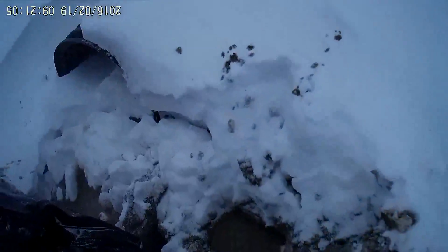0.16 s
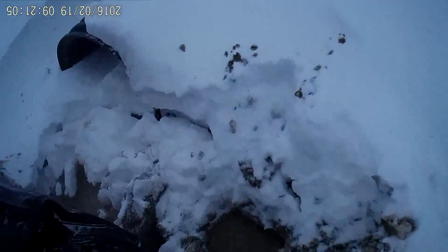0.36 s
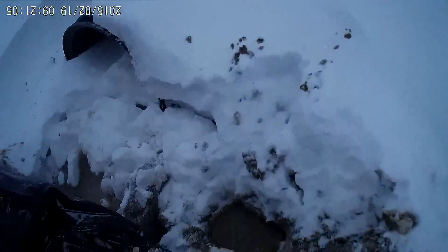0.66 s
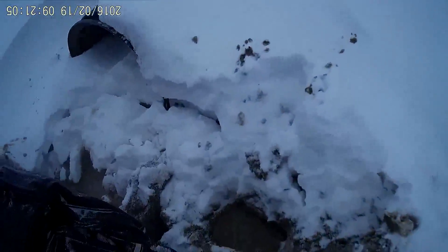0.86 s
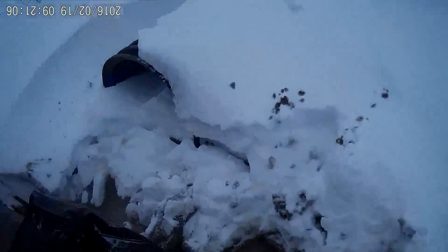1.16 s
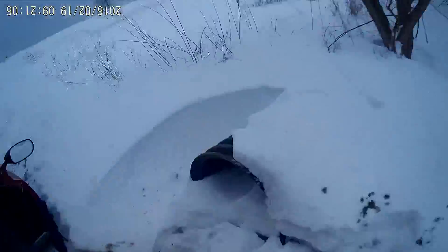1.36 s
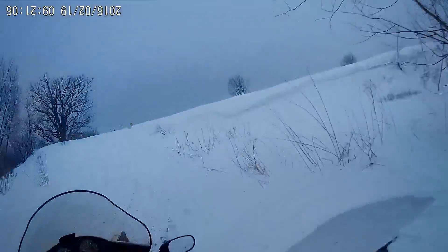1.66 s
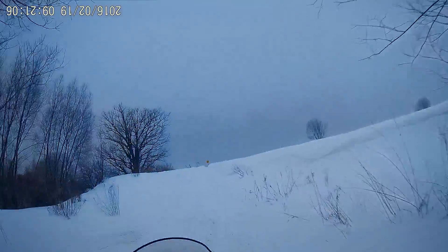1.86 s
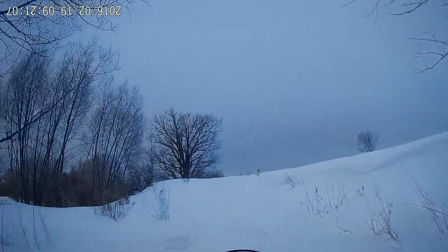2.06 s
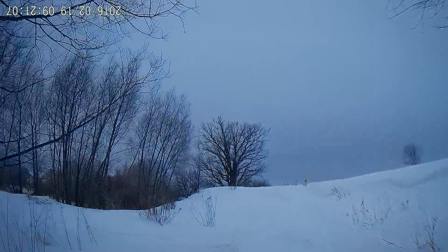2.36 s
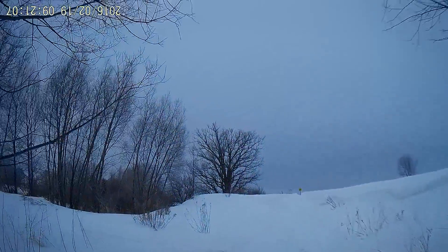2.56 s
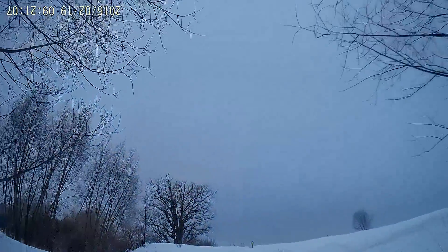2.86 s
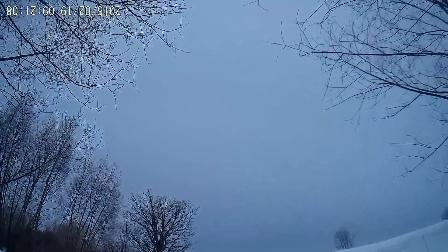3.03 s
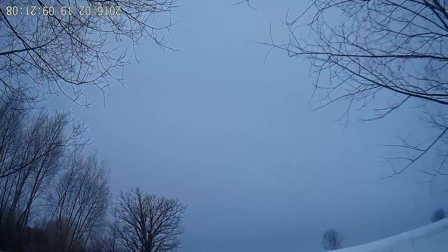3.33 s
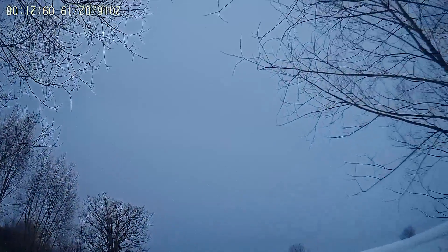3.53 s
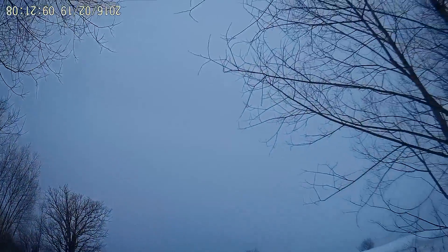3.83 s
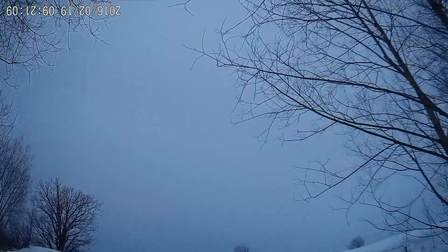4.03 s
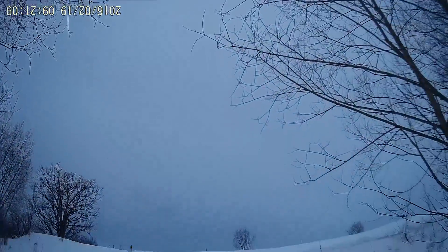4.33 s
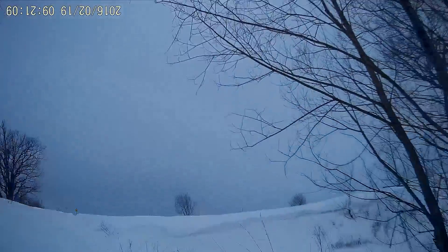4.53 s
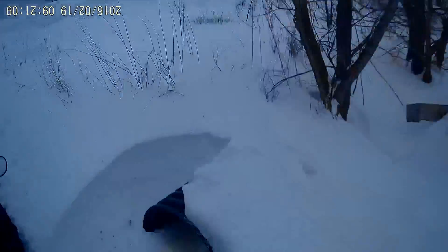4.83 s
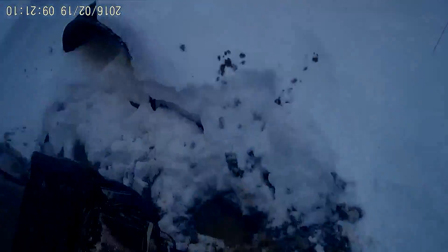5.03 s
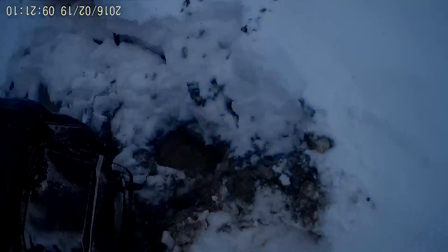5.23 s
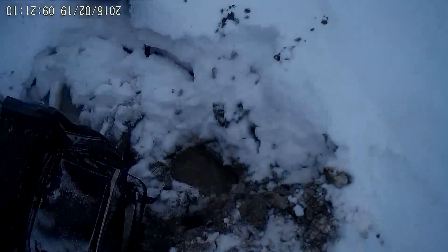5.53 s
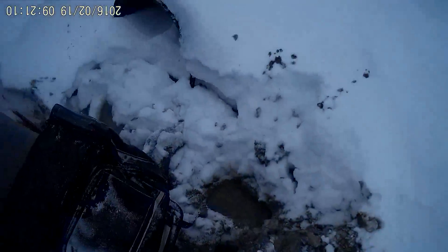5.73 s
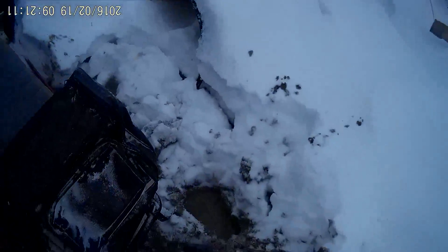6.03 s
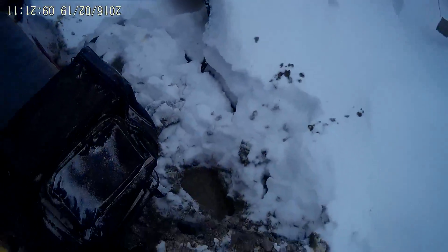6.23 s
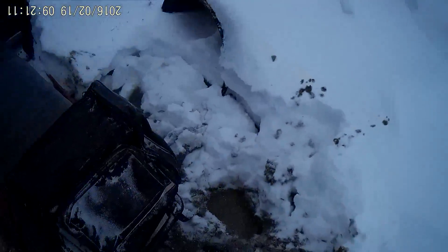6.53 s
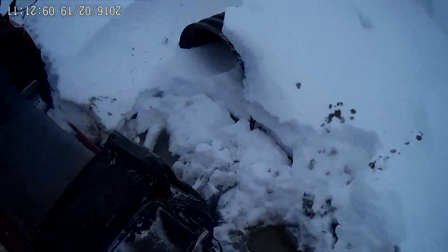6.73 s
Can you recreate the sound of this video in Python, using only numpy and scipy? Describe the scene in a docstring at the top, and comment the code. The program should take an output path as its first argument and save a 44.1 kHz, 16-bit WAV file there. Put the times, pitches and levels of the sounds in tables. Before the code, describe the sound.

A two-stroke snowmobile idles quietly for the whole seven seconds, an uneven hum with soft burbling thuds and a light, hissy rattle over a low wash of air. The microphone is worn by the rider, outdoors, with no echo. A tiny high squeak comes at about 1.2 seconds. From 2 to 4.5 seconds the idle sounds thinner, with a faint whine, four small sharp engine ticks and two light tocks near 3.4 and 4 seconds. At 4.8 seconds stiff jacket cloth bumps and scrapes the microphone, much louder than the engine. Crisp crackles of crusted snow and more rubbing follow in bursts, strongest around 5 and 6 seconds, while the idle grows a little louder. At 6.3 seconds a fastener strikes the microphone's case with a bright snap, the loudest sound. Another bump, scrape and sharp crackle follow at 6.6 seconds.

```python
"""First comes the uneven hum, burble and clatter of a two-stroke snowmobile idling, bogged in snow.
Each stroke pumps the exhaust; each firing thuds in the muffler and shakes the engine.
We hear it from a camera worn by the rider, who looks up, then down. Over a low wash of air come
a tiny squeak, a few sharp ticks from the engine and two light tocks on the sled. Then stiff jacket
cloth bumps and scrapes the camera, crusted snow crackles and a fastener snaps against the case."""
import sys
import numpy as np
from scipy import signal
from scipy.fft import rfft, irfft
from scipy.io import wavfile

SR = 44100
rng = np.random.default_rng(int(sys.argv[2]) if len(sys.argv) > 2 else 0)


def put_to_file(sound):
    """Save the sound as 16-bit audio at rate SR, in the file named by the first command-line argument."""
    columns = np.atleast_2d(sound).T  # one column per channel
    safe = np.clip(columns, -1, 1)
    whole_steps = np.round(safe * 32767)
    wavfile.write(sys.argv[1], SR, whole_steps.astype(np.int16))


N = 303849
T = np.arange(N) / SR
HZ = np.fft.rfftfreq(N, 1 / SR)


def amp(db):
    """Turns decibels into a gain."""
    return 10 ** (np.asarray(db) / 20)


def unit(x):
    """Scales a sound to an average (rms) level of 1."""
    return x / np.sqrt(np.mean(x ** 2) + 1e-20)


def curve(rows):
    """Joins (time_s, value) points with straight lines."""
    return np.interp(T, *np.transpose(rows))


def add(mix, start_s, sound):
    """Mixes a sound in at start_s."""
    part = mix[round(start_s * SR):][:len(sound)]
    part += sound[:len(part)]


def colour(points, peaks=(), hz=HZ):
    """A gain for each pitch: a broad shape with ringing peaks on top."""
    pitches, db = np.transpose(points)
    power = amp(np.interp(np.log(hz + 1), np.log(pitches), db)) ** 2
    for centre, width, peak_db in peaks:
        power += amp(peak_db) ** 2 / (1 + 2 * ((hz - centre) / width) ** 2) ** 2
    return np.sqrt(power)


def shaped(x, gain):
    """Filters a sound with a gain for each pitch."""
    return irfft(rfft(x) * gain, len(x))


def noise(gain, length=N):
    """Filtered noise at level 1."""
    return unit(shaped(rng.standard_normal(length), gain))


def wander(rate_hz):
    """A smooth random drift."""
    return noise(np.exp(-(HZ / rate_hz) ** 2))


def fuzzy_tone(pitch_hz, width_hz):
    """Noise so narrow that it has a pitch."""
    return noise(1 / (1 + 2 * ((HZ - pitch_hz) / width_hz) ** 2))


def play_bands(x, gain, edges_hz, levels_db):
    """Filters a sound, then lets each pitch band follow its own level."""
    bands = [unit(shaped(x, gain * (HZ >= lo) * (HZ < hi))) for lo, hi in zip(edges_hz, edges_hz[1:])]
    return sum(amp(db) * band for db, band in zip(levels_db, bands))


def grains(per_s, spread_db):
    """Scattered clicks, most small and a few large."""
    size = amp(spread_db * np.minimum(rng.exponential(1, N), 4)) * rng.choice([-1, 1], N)
    return unit(size * (rng.random(N) < per_s / SR))


def swell(t, peak_s):
    """A pulse that rises to 1 at peak_s and dies away."""
    return (t / peak_s) ** 2 * np.exp(2 * (1 - t / peak_s))


def reflected(x, wet, decay_s):
    """Adds very short echoes from nearby panels."""
    t = np.arange(SR // 30) / SR
    tail = rng.standard_normal(len(t)) * np.exp(-t / decay_s) * (t > .002)
    return x + wet * signal.oaconvolve(x, tail / np.linalg.norm(tail))[:N]


def struck(blows, tones, rise_s):
    """A hard thing rings with the same tones at each blow."""
    out, t = np.zeros(N), np.arange(SR // 20) / SR
    ring = sum((-1) ** k * amp(db - 60 * t / fade_s) * np.sin(2 * np.pi * hz * t)
               for k, (hz, db, fade_s) in enumerate(tones))
    ring *= 1 - np.exp(-t / rise_s)
    for start_s, db in blows:
        add(out, start_s, amp(db) * ring / abs(ring).max())
    return out


def firings(stroke_count, miss_chance, uneven_db=1.5, weak_gain=0.64):
    """Fuel burns about every fourth or fifth stroke, weak and strong by turns; weak ones can miss."""
    strokes = np.flatnonzero(np.diff(np.floor(stroke_count)))
    gaps = rng.choice([3] + [4] * 6 + [5] * 5, len(strokes))
    chosen = np.cumsum(gaps) - gaps[0]
    fired = strokes[chosen[chosen < len(strokes)]]
    kicks = np.zeros(N)
    kicks[fired] = amp(uneven_db * rng.standard_normal(len(fired)))
    weak = fired[::2]
    kicks[weak] *= weak_gain * (rng.random(len(weak)) > miss_chance[weak])
    return kicks


def exhaust_hum(phase, kicks, level_db, collapse_s=0.0039, rebuild_s=0.02):
    """Strokes keep a wave going in the pipe; a strong firing breaks it up and it builds again."""
    t = np.arange(SR // 10) / SR
    hum = np.sin(phase) + amp(-19) * np.sin(2 * phase) + amp(-23) * np.sin(3 * phase)
    dip = 1.8 * (np.exp(-t / rebuild_s) - np.exp(-t / collapse_s))
    hum *= np.exp(-signal.oaconvolve(kicks ** 2, dip)[:N])
    return unit(hum) * amp(level_db + 0.36 * wander(30))


# The muffler's low tones: pitch_hz, level_db, swell_s
MUFFLER_TONES = [(63.6, -12.5, 0.039), (194.7, 4.5, 0.0075), (243.7, -4.5, 0.0061), (404, -9, 0.0014),
                 (499.4, -23.5, 0.013)]
def burble(kicks, extra_db, gaze):
    """Each firing rings the muffler with a soft thud."""
    t = np.arange(SR // 10) / SR
    thud = sum(amp(db) * swell(t, swell_s) * np.sin(2 * np.pi * hz * t)
               for hz, db, swell_s in MUFFLER_TONES)
    return amp(-51 + 1.12 * extra_db - 5 * gaze) * unit(signal.oaconvolve(kicks, thud)[:N])


# The clatter from bass to treble: pitch_hz, level_db
CLATTER_SHAPE = [(250, -8), (420, -11), (650, -19), (900, -15), (1600, -12.5), (2300, -23), (3100, -4),
                 (3500, -16), (6500, -12.5), (9000, -20), (11000, -19.5), (15500, -29)]
# Where the engine and its hood ring: pitch_hz, width_hz, level_db
HOOD_RINGS = [(496, 14, -6), (928, 23, -2), (1161, 106, 0), (1453, 90, -5.5), (2220, 310, -7),
              (2720, 280, 0.5), (2880, 230, -1), (3950, 470, -12.5), (4880, 400, -12), (5820, 230, -13),
              (6920, 360, -1.5), (7360, 300, -6.5), (8360, 560, -11), (9510, 290, -8)]
# Brief surges and dips: middle_s, half_length_s, knock_and_rattle_db, hiss_db
CLATTER_SURGES = [(0.492, 0.039, 2, 3), (1.08, 0.039, 4, 3.5), (1.231, 0.066, 5, 5), (1.75, 0.099, 2, 3.5),
                  (2.093, 0.054, -0.5, 2.5), (2.916, 0.02, 4.5, 4.5), (3.273, 0.1, 0.5, 4.5),
                  (4.563, 0.13, 5, 2.5), (5.45, 0.05, -2.5, -5)]
def clatter(phase, flare, extra_db, gaze):
    """The shaken engine knocks, rattles and hisses, throbbing with strokes and flaring with firings."""
    shake = (1 + 0.57 * flare) * (1 + 0.091 * np.cos(phase)) * amp(1.17 * wander(1.7))
    grit = rng.standard_normal(N) + 0.37 * grains(per_s=700, spread_db=3)
    drive = reflected(shake * grit, wet=.33, decay_s=.008)
    surges = sum(np.outer(dbs, np.exp(-((T - middle_s) / half_s) ** 2))
                 for middle_s, half_s, *dbs in CLATTER_SURGES)
    surge_db, hiss_surge_db = surges + 0.02
    knock_db = -57.5 + 0.87 * extra_db - gaze + surge_db
    rattle_db = -57.5 + 1.46 * extra_db + 2.56 * gaze + surge_db
    hiss_db = -59.5 + extra_db + 3.87 * gaze + hiss_surge_db
    levels_db = [db + 1.03 * wander(32) for db in (knock_db, rattle_db, hiss_db)]
    return play_bands(drive, colour(CLATTER_SHAPE, HOOD_RINGS), [280, 1900, 3500, SR / 2], levels_db)


# The bright spit of gas: pitch_hz, level_db
SPIT_SHAPE = [(2500, -21), (5000, -13), (7500, 6), (10000, 1), (15000, 4)]
def spit(flare, extra_db):
    """Gas spits out at each strong firing."""
    return amp(-55 + extra_db) * np.tanh(flare) ** 2 * noise(colour(SPIT_SHAPE))


# The idle speed: time_s, strokes_per_s
IDLE_SPEED = [(0.0, 95.8), (0.5, 96.2), (1.3, 93.5), (2.1, 95.2), (2.8, 94.8), (4.1, 97.2), (4.8, 97.5),
              (5.5, 93.0), (6.0, 91.6), (6.89, 92.2)]
# The engine's loudness, higher when the rider leans in: time_s, level_db
ENGINE_LEVEL = [(0, -45), (0.9, -45), (1.8, -43.5), (2.5, -45.5), (3.1, -45), (3.9, -46.5), (4.65, -47),
                (5.1, -40.5), (5.45, -43.5), (6.0, -38.5), (6.42, -42.5), (6.89, -37.5)]
# Where the rider looks: time_s, gaze (0 is down at the sled, 1 or more is up at the sky)
RIDER_GAZE = [(0, 0.033), (1.25, 0.012), (1.75, 0.43), (2.4, 1.56), (3.3, 1.05), (4.3, 1.67), (4.95, 0.025),
              (6.89, 0.14)]
def engine(usual_db=-45):
    """One beat drives the engine's sounds; looking up thins the burble and lets a faint whine through."""
    level_db, gaze = curve(ENGINE_LEVEL), curve(RIDER_GAZE)
    extra_db = level_db - usual_db
    stroke_count = np.cumsum(curve(IDLE_SPEED)) / SR + 0.038 * wander(12)
    phase = 2 * np.pi * stroke_count
    kicks = firings(stroke_count, miss_chance=0.31 * gaze)
    t = np.arange(SR // 10) / SR
    flare = signal.oaconvolve(kicks ** 2, swell(t, peak_s=0.0067))[:N]  # a pulse for each firing
    exhaust = exhaust_hum(phase, kicks, level_db - 0.9) + burble(kicks, extra_db, gaze)
    rasp = clatter(phase, flare, extra_db, gaze) + spit(flare, extra_db)
    whine = gaze * amp(level_db - 26.5) * fuzzy_tone(pitch_hz=5910, width_hz=140)
    return exhaust + rasp + whine


# The low wash of air: pitch_hz, level_db
AIR_SHAPE = [(10, -28), (25, -4), (42, 5.5), (70, -12.5), (150, -0.5), (240, -8.5), (310, -60),
             (700, -19.5), (2000, -33)]
def air(level_db=-56):
    """The open air rumbles softly."""
    return amp(level_db) * noise(colour(AIR_SHAPE))


# The squeak's tones: multiple_of_base_pitch, level_db
SQUEAK_TONES = [(2, 0), (3, -11), (4, -6)]
def squeak(start_s=1.23, length_s=0.08, base_hz=3330, sag_hz=150, sag_s=0.0077, level_db=-52.5):
    """Quick sticking and slipping makes a thin whistle that swells, sags in pitch and fades."""
    t = np.clip(T - start_s, 0, length_s)
    hz = (base_hz + sag_hz * np.exp(-t / sag_s)) * (1 + 0.0051 * wander(180))
    phase = 2 * np.pi * np.cumsum(hz) / SR
    tone = unit(sum(amp(db) * np.sin(multiple * phase) for multiple, db in SQUEAK_TONES))
    return amp(level_db) * np.sin(np.pi * t / length_s) * tone


# Ticks, crackles and scrapes from bass to treble: pitch_hz, level_db
CRISP_SHAPE = [(60, -13), (250, -13.5), (420, -13.5), (680, -26), (950, -17), (1700, -5.5), (2400, 1.5),
               (4500, -16.5), (7000, -7.5), (8000, -15.5), (10000, -12), (13000, -17.5), (15500, -25)]
# Where the camera case rings: pitch_hz, width_hz, level_db
CASE_RINGS = [(1024, 250, -0.5), (1530, 310, 0.5), (3050, 530, 2.5), (3830, 570, -0.5), (4640, 660, 0.5),
              (5890, 1050, -2), (6990, 550, 3.5), (8350, 500, -3.5), (9500, 430, -3.5), (13900, 700, -22)]
# Four engine ticks, then crackles of snow crust and cloth: start_s, level_db, pitch_hz, decay_s
TICKS_AND_CRACKLES = [(1.907, -34, 3500, 0.0041), (2.789, -38.5, 3520, 0.0061), (3.793, -37, 3980, 0.0043),
                      (4.016, -32, 4000, 0.0018), (4.917, -19, 5000, 0.0037), (4.996, -17, 4000, 0.0039),
                      (5.013, -12, 3530, 0.0034), (5.063, -23, 4500, 0.0057), (5.135, -27, 2500, 0.0023),
                      (5.188, -28, 2000, 0.0035), (5.522, -18.5, 8550, 0.00083), (5.55, -25, 4960, 0.0017),
                      (5.707, -21, 6000, .003), (5.752, -23, 4516, 0.0026), (5.844, -22.5, 5000, .002),
                      (5.867, -17, 9100, .001), (5.879, -18.5, 5030, 0.0051), (5.898, -12.5, 6200, 0.0017),
                      (5.976, -9, 4500, 0.0013), (5.979, -11, 5000, 0.0026), (6.081, -16, 4000, 0.0011),
                      (6.138, -21, 7000, 0.0013), (6.251, -17, 6000, 0.0014), (6.571, -23, 3970, 0.0022),
                      (6.5853, -19, 4960, 0.01), (6.5928, -12.5, 3470, 0.0016), (6.6199, -6, 2500, 0.0019),
                      (6.778, -31, 3000, 0.0018)]
def ticks_and_crackles(width_octaves=2.1, gain_db=-11.5, rise_s=0.000088):
    """Each tick or crackle is a short burst of noise around its own pitch, coloured by the case."""
    out, t = np.zeros(N), np.arange(SR // 20) / SR
    hz = np.fft.rfftfreq(len(t), 1 / SR)
    case = colour(CRISP_SHAPE, CASE_RINGS, hz)
    for start_s, db, pitch_hz, decay_s in TICKS_AND_CRACKLES + settling():
        focus = np.exp(-.5 * (np.log2((hz + 1) / pitch_hz) / width_octaves) ** 2)
        fade = 2 * np.exp(-t / decay_s) * (1 - np.exp(-t / rise_s))
        add(out, start_s, amp(db + gain_db) * fade * noise(case * focus, len(t)))
    return out


# Two light tocks on the sled: start_s, peak_db
SLED_TOCKS = [(3.402, -36.5), (4.016, -29)]
# The panel's tones: pitch_hz, level_db, fade_s (time to fall 60 dB)
PANEL_TONES = [(1255, -3.5, 0.037), (1480, -3, 0.02), (2180, 2.5, 0.013), (2400, 2.5, 0.018),
               (2900, -4, 0.011), (6600, -8, .01)]
def tocks():
    """Light blows ring a panel of the sled."""
    return struck(SLED_TOCKS, PANEL_TONES, rise_s=0.00026)


# Soft bumps on the camera: start_s, level_db, push_s
CAMERA_BUMPS = [(4.7918, -18, 0.0033), (4.822, -29, 0.0072), (6.609, -27, 0.0034)]
def bumps(knock_hz=930, knock_s=0.011, puff_s=0.0083):
    """Each bump pushes air on the microphone, with a puff of cloth and a dull knock of the case."""
    out, t = np.zeros(N), np.arange(SR // 8) / SR
    hz = np.fft.rfftfreq(len(t), 1 / SR)
    dull = colour([(150, -4.5), (700, -12), (1500, -14), (4000, -18.5), (15000, -53)], hz=hz)
    for start_s, db, push_s in CAMERA_BUMPS:
        knock = np.exp(-t / knock_s) * np.sin(2 * np.pi * knock_hz * t)
        puff = np.exp(-t / puff_s) * noise(dull, len(t))
        add(out, start_s, amp(db) * (swell(t, push_s) + amp(-11) * (knock + puff)))
    return out


# Rubs of cloth on the case: start_s, rise_s, hold_s, fade_s, body_db, fizz_db, ring_hz, ring_db
CLOTH_RUBS = [(4.793, 0.037, 0.097, 0.061, -30.5, -31.5, 970, -44),
              (4.862, .04, 0.024, .035, -34.5, -30.5, 5900, -32.5),
              (4.978, 0.017, 0.017, 0.022, -32.5, -28.5, 2930, -38),
              (5.034, 0.018, .12, 0.088, -46.5, -47.5, 2880, -61),
              (5.626, 0.059, 0.17, 0.073, -43.5, -44, 2880, -57),
              (5.883, 0.11, 0.011, 0.061, -25, -26, 1510, -36.5),
              (6.082, 0.028, 0.048, 0.73, -48.5, -47.5, 1540, -52),
              (6.606, 0.015, 0.0021, 0.0028, -23, -17, 1510, -26.5),
              (6.618, 0.056, 0.058, 0.015, -27.5, -25, 2970, -31),
              (6.771, 0.05, 0.013, 0.074, -36.5, -38.5, 2830, -43)]
def scrape(gain_db=-3):
    """Cloth catches and lets go in tiny slips and crisp ticks; each rub rings the case at one pitch."""
    slips = rng.standard_normal(N) + grains(per_s=2200, spread_db=4.9)
    slips *= amp(0.9 * wander(47))
    ticks = shaped(grains(per_s=220, spread_db=3), colour([(1000, -3), (6000, 0), (11000, 3)]))
    drive = reflected(slips + .35 * ticks, wet=.35, decay_s=.004)
    power, rings = np.zeros((2, N)), np.zeros(N)
    for start_s, rise_s, hold_s, fade_s, body_db, fizz_db, ring_hz, ring_db in CLOTH_RUBS:
        rise = np.sin(np.pi / 2 * np.clip((T - start_s) / rise_s, 0, 1))
        pressure = rise * np.exp(-np.maximum(T - start_s - rise_s - hold_s, 0) / fade_s)
        power += (amp([[body_db], [fizz_db]]) * pressure) ** 2
        rings += amp(ring_db) * pressure * fuzzy_tone(ring_hz, width_hz=190)
    levels_db = 10 * np.log10(power + 1e-14) + gain_db
    return rings + play_bands(drive, colour(CRISP_SHAPE, CASE_RINGS), [40, 3500, SR / 2], levels_db)


def settling(per_rub=3, within_s=0.082, level_db=-28.5, pitch_hz=6000, decay_s=0.00082):
    """The crust settles after each rub, giving a few random rows for ticks_and_crackles()."""
    ends_s = np.repeat([start + rise + hold for start, rise, hold, *_ in CLOTH_RUBS], per_rub)
    draws = rng.uniform([0, -2, -1], [within_s, 2, 1], (len(ends_s), 3))
    return [(end_s + late_s, level_db + extra_db, pitch_hz * 2 ** octaves, decay_s)
            for end_s, (late_s, extra_db, octaves) in zip(ends_s, draws)]


# The fastener's hit and bounce: start_s, level_db
FASTENER_HITS = [(6.3298, 3), (6.3379, -14)]
# The fastener's tones: pitch_hz, level_db, fade_s (time to fall 60 dB)
FASTENER_TONES = [(1430, -19.5, 0.013), (2420, -1.5, 0.0047), (3150, -4.5, 0.014), (4120, 5, 0.003),
                  (5020, 3, 0.0066), (5660, 0, 0.01), (7270, 7.5, 0.0026), (8460, -3.5, 0.0091),
                  (9680, -1, 0.0037), (11700, -6, 0.0028), (14500, -11, 0.0049)]
def snap():
    """A fastener strikes the camera, rings brightly and bounces once."""
    return struck(FASTENER_HITS, FASTENER_TONES, rise_s=0.00019)


def scene():
    """Snow gives no echo; one microphone feeds both channels."""
    mono = engine() + air() + squeak() + ticks_and_crackles() + tocks() + bumps() + scrape() + snap()
    return np.array([mono, mono])


def record(dry, ceiling=.73, cutoff_hz=15500):
    """The sharpest snap overloads the microphone; then the highest treble is cut."""
    lowpass = signal.firwin(255, cutoff_hz, window=("kaiser", 9), fs=SR)
    return signal.oaconvolve(np.clip(dry, -ceiling, ceiling), lowpass[None], "same")


dry = scene()
out = record(dry)
put_to_file(out)
```